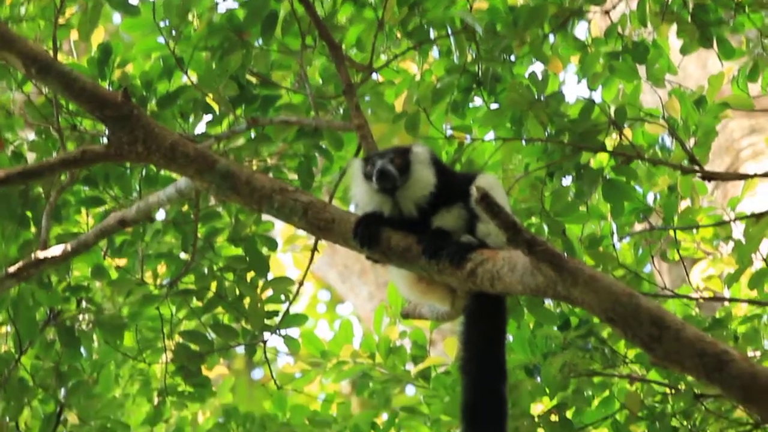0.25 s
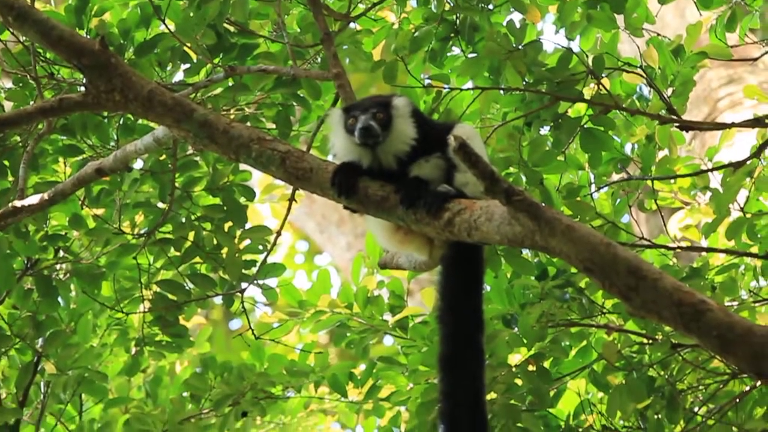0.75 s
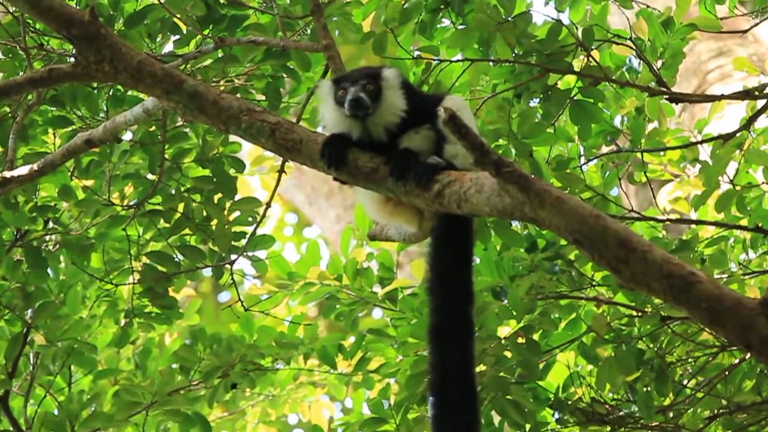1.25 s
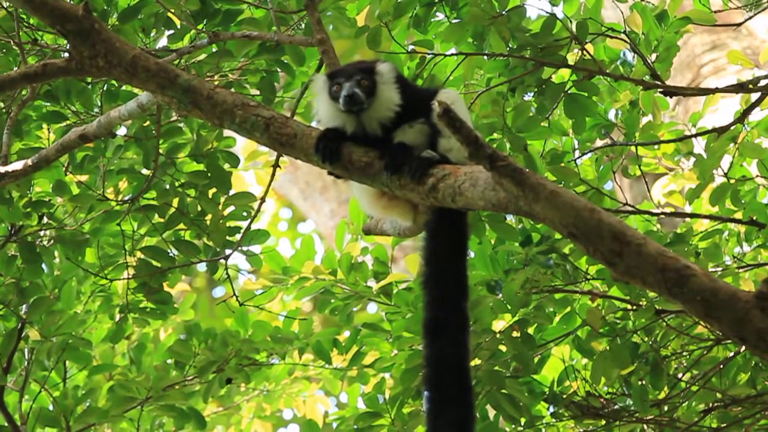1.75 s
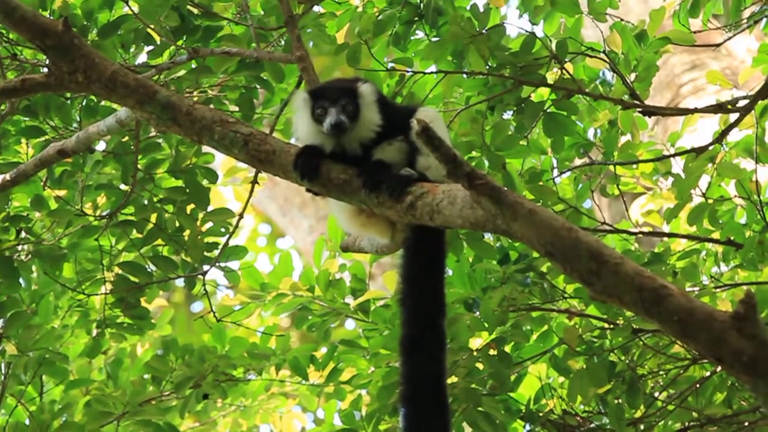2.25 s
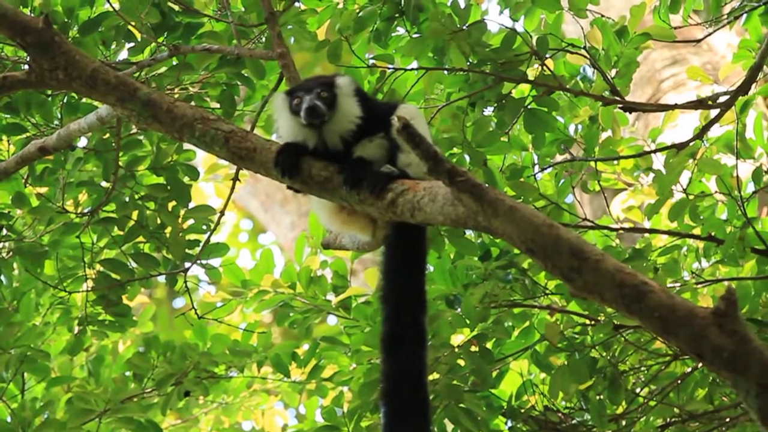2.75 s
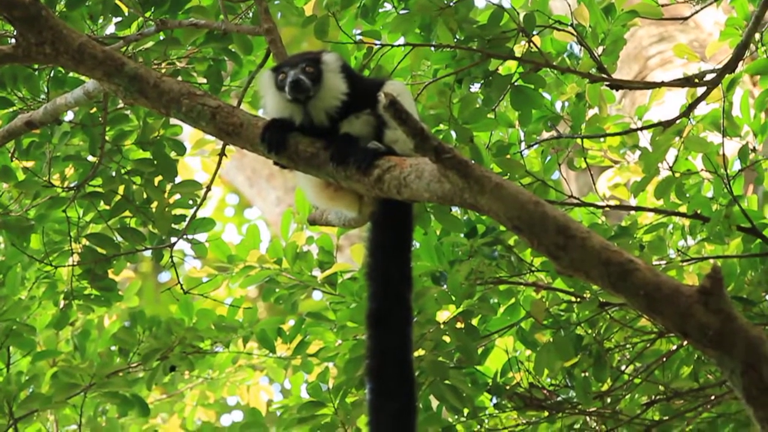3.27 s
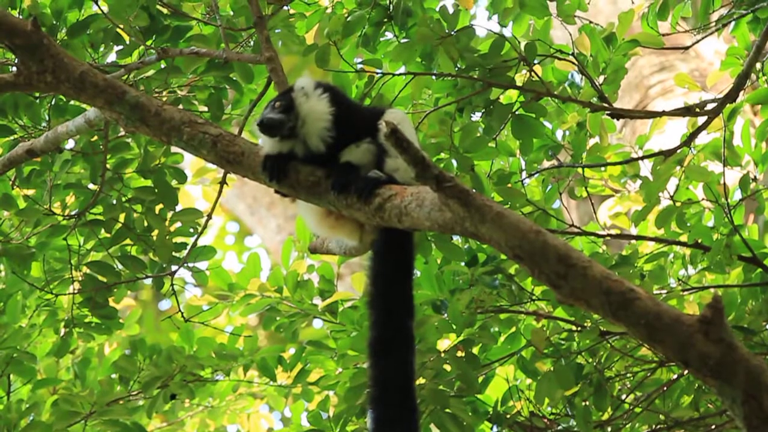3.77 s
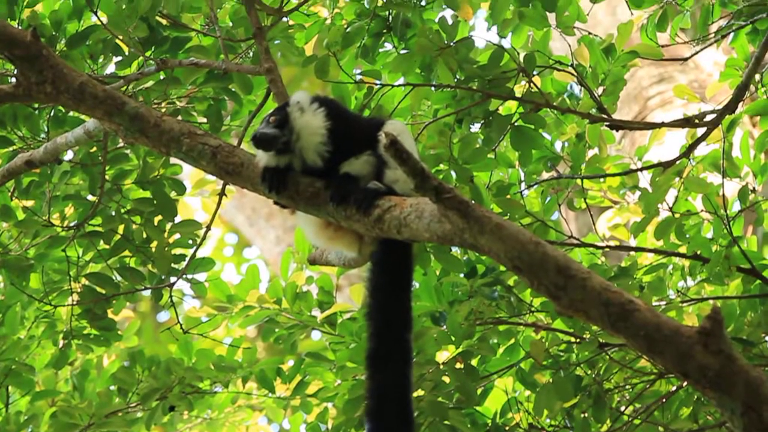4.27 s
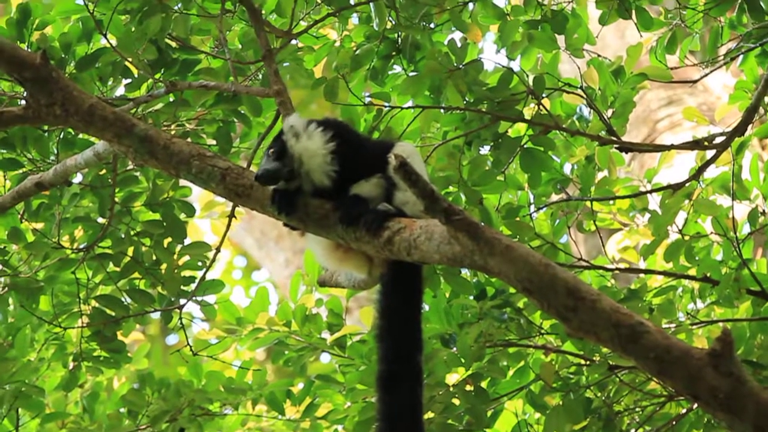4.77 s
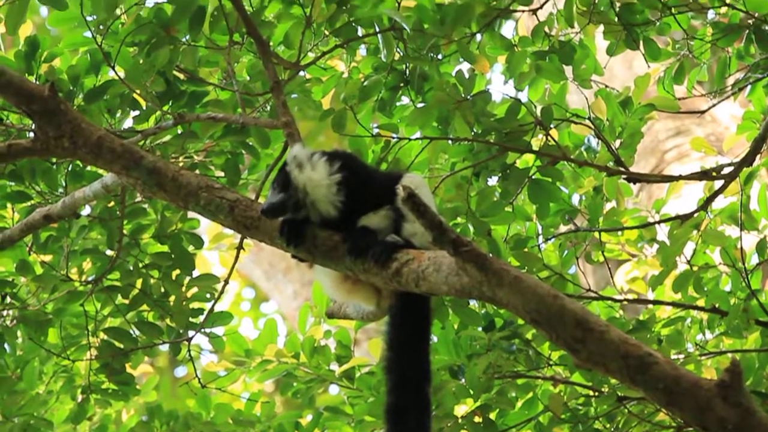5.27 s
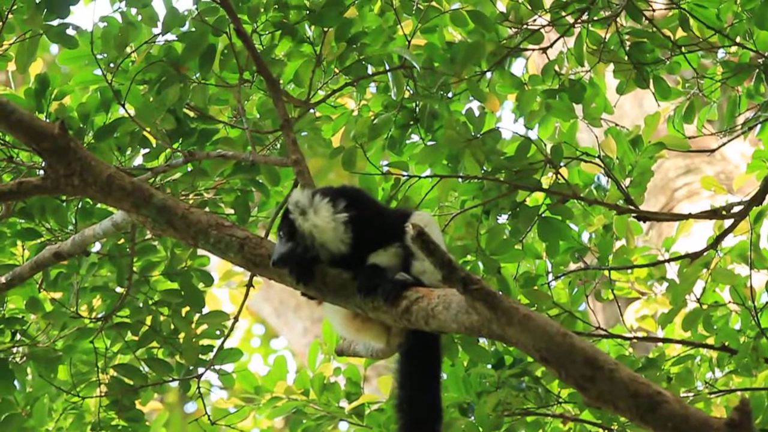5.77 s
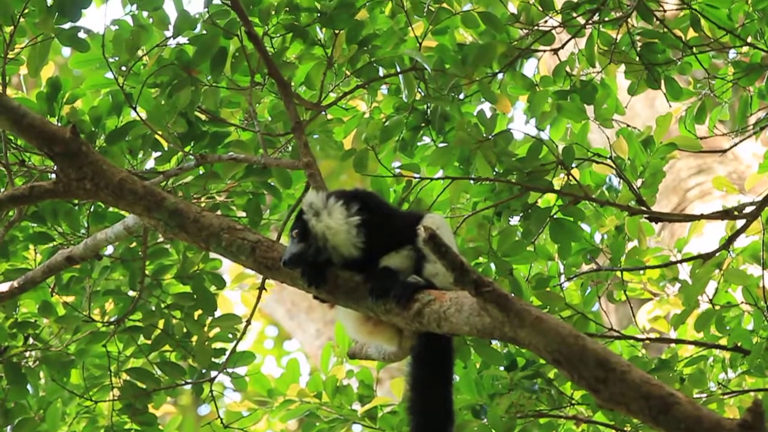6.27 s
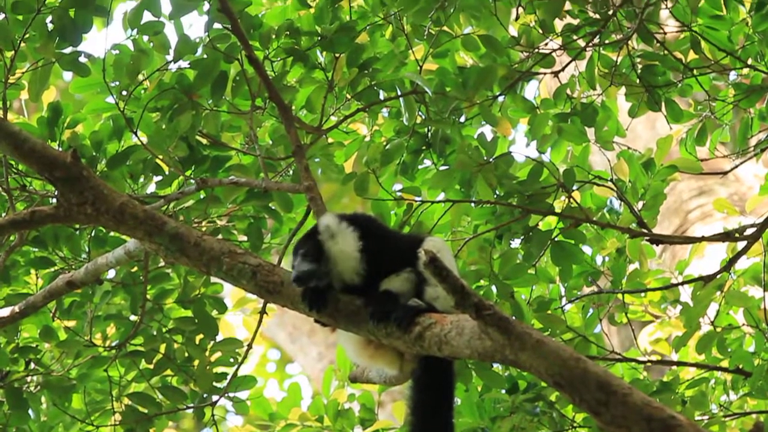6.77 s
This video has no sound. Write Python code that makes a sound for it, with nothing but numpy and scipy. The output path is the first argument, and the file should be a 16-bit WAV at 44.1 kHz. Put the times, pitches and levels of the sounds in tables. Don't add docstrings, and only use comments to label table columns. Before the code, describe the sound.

A humid rainforest heard from one fixed spot, in mono. Throughout, cicadas hold a very high, airy hiss, thin cricket whistles waver faintly, a far stream murmurs, and a distant crowd of frogs clatters softly, blurred by echoes and gently rising and falling. A katydid gives a quick dry rattle at once, then near 0.9, 2.5, 2.8 (faint), 3.9 and 5.4 seconds. From 0.2 seconds individual frogs knock at different pitches and distances, some dull and dry, others smeared among leaves. A nearer frog cuts through with sharp, woody double clicks and short trunk echoes at about 0.9, 1.6, 2.3, 2.9, 3.6, 4.5, 5.4 and 6.6. Faint low breeze swells around 2 and strongest near 5.7. Soft drops land at 1.0, 2.5 and 2.8; a bigger one slaps and spatters at 5.7. From about 4 seconds a closer cicada swells, staying brighter to the end at seven.

```python
import sys
import numpy as np
from scipy import signal
from scipy.io import wavfile
from scipy.ndimage import uniform_filter1d

SR = 44100
rng = np.random.default_rng(int(sys.argv[2]) if len(sys.argv) > 2 else 0)


def store_wav(level_fs):
    pcm = np.round(np.clip(np.atleast_2d(level_fs), -1, 1) * 32767)
    wavfile.write(sys.argv[1], SR, pcm.T.astype(np.int16))


def field_ratio(decibels):
    return 10 ** (np.asarray(decibels, dtype=float) / 20)


N = 309701

# freq_hz, density_db_per_hz
STREAM_SPECTRUM = [(25, -58), (60, -19), (120, -17.5), (230, -11), (400, -12.5), (800, -14), (950, -20),
                   (1500, -18.5), (3000, -26.5), (5300, -24.5), (6500, -17.5), (7500, -17), (8500, -11.5),
                   (11000, -32)]
STREAM_LEVEL_DB = -47.5
# freq_hz, width_hz, level_db
STREAM_HOLLOWS = [(325.4, 54, -66), (533.7, 24, -60), (757, 34, -60), (825, 50, -67)]
# freq_hz, density_db_per_hz
BREEZE_SPECTRUM = [(40, -32), (90, -2.5), (200, 1.5), (330, 7), (450, -59)]
# centre_s, level_db
GUSTS = [
    (0, -72),
    (1.86, -53.5),
    (2.7, -53.5),
    (4.9, -55),
    (5.7, -47),
]
GUST_WIDTH_S, LULL_DB = 0.32, -72
# freq_hz, width_hz, level_db
CRICKETS = [(5890, 27, -65.5), (6900, 26, -71), (4296, 50, -70)]

# freq_hz, density_db_per_hz
CICADA_SPECTRUM = [(6180, -31), (10300, -16), (11000, 0), (12600, 7.5), (14200, 6.5), (15200, 5.5),
                   (15400, 1), (16300, 0)]
CICADA_LEVEL_DB = -40
# freq_hz, density_db_per_hz
SWELL_SPECTRUM = [(4290, -40), (7300, -24), (7870, -10.5), (8520, 2), (9200, 2.5), (9900, 3), (10200, 2.5),
                  (10900, -10), (11200, -18), (14600, -32), (22000, -120)]
# time_s, level_db
SWELL_EFFORT = [(0, -45), (.6, -47), (3.3, -49), (3.8, -46), (5.0, -43), (5.6, -40.5), (7.02, -40.5)]

# time_s, level_db
CHORUS_LEVEL = [(0, -40.5), (1.0, -40.5), (1.25, -44.5), (1.6, -39), (2.1, -43.5), (2.9, -40), (3.5, -41),
                (4.1, -39.5), (4.8, -43), (5.6, -40.5), (6.0, -41), (7.02, -41)]
CHORUS_CALLS_PER_S, CHORUS_SPREAD_DB, CHORUS_TREBLE_DB = 180, 4.5, -1
# freq_hz, width_hz, level_db
FAR_SAC = [(1805, 76, 1), (1930, 140, -4.5), (2076, 810, 18), (2376, 270, 12), (2560, 540, -29),
           (2900, 42, -15)]
# freq_hz, width_hz, level_db
FAR_SAC_TOP = [(3740, 450, -5), (4044, 330, -5.5), (4580, 350, -7), (4930, 360, -10), (5520, 340, -14.5),
               (6310, 150, -23)]

# start_s, peak_db, wing_hz
KATYDID_CALLS = [
    (.034, -25, 9100),
    (0.872, -27, 8470),
    (2.524, -27, 8600),
    (2.802, -36, 8900),
    (3.904, -26.5, 8560),
    (5.355, -26, 8420),
]
STROKE_MS, STROKE_FADE_MS = 7.2, 71

# start_s, peak_db
BASS_VOICE = (1820, -13, 4, -2)
BASS_CALLS = [(0.2277, -22), (1.6662, -30), (1.9356, -21), (2.8069, -21), (3.213, -27.5), (3.598, -23),
              (4.491, -20.5), (5.4451, -22), (5.5277, -28.5), (6.195, -22.5)]
TENOR_VOICE = (2340, -13.5, 1, 5.5)
TENOR_CALLS = [(0.2545, -28.5), (1.1652, -32), (1.3221, -33), (1.9912, -30), (3.5751, -26), (4.263, -33.5),
               (4.4544, -33), (4.6825, -27.5), (4.8065, -40), (5.246, -29.5), (5.7219, -29.5),
               (5.8113, -30.5), (6.5904, -36), (6.9798, -36)]
NEIGHBOUR_VOICE = (2200, -28, .4, -4)
NEIGHBOUR_CALLS = [(.3308, -20.5), (1.5052, -21.5), (2.336, -20.5), (3.2917, -21), (4.158, -21),
                   (5.044, -23)]
DRY_VOICE = (2400, -17, 1.5, -4)
DRY_CALLS = [(0.433, -27), (1.264, -24.5), (1.562, -23), (2.2657, -27), (2.597, -25.5), (5.0517, -20),
             (5.4922, -31), (5.9446, -29), (6.13, -27), (6.6406, -31)]
ALTO_VOICE = (2520, -12.5, 7.5, 2.6)
ALTO_CALLS = [(0.5372, -30.5), (1.3912, -29), (1.6239, -29.5), (1.7647, -30.5), (1.9575, -27.5),
              (4.759, -25.5), (6.1438, -24.5), (6.539, -23.5), (6.905, -27), (6.9556, -29)]
GULLY_VOICE = (2330, -8, .65, 7.5)
GULLY_CALLS = [(.8361, -26.5), (1.2211, -26.5), (1.2953, -32.5), (2.2452, -27), (2.615, -31), (3.1875, -28)]
BRIGHT_VOICE = (2472, -7.5, 3.5, -2.5)
BRIGHT_CALLS = [(1.0101, -28), (3.262, -35), (3.8087, -35), (3.8803, -32), (4.0523, -26.5), (5.0059, -30.5)]
PITCH_SCATTER = 0.021
FAR_T60_S, FAR_CUTOFF_HZ = 0.59, 2950

# start_s, peak_db
NEAR_CALLS = [
    (.8837, -14),
    (1.5712, -13.7),
    (2.3025, -14.2),
    (2.8945, -13.8),
    (3.6305, -14.3),
    (4.5153, -14.3),
    (5.4259, -14.2),
    (6.5595, -14),
]
# freq_hz, width_hz, level_db
NEAR_SAC = [(1850, 105, -6), (2250, 200, -15), (2590, 220, 0), (2922, 45, -17), (3080, 50, -24)]
# freq_hz, width_hz, level_db
NEAR_SAC_TOP = [(3500, 160, -21), (3950, 220, -18), (4360, 160, -14), (4890, 170, -19), (5780, 300, -14),
                (6230, 150, -20), (6800, 220, -18)]
# low_hz, high_hz
SAC_EDGES_HZ = [1886, 7500]
# delay_ms, level_db
TRUNK_ECHOES = [(1.7, -11), (7.0, -10), (9.3, -13), (12.5, -15), (17, -16), (23.5, -18), (29, -16),
                (33.5, -16), (35.5, -13), (49, -18), (80, -19)]
NEAR_WET_DB, NEAR_T60_S, NEAR_TOP_T60_S = -6, .33, .15
NEAR_GAP_MS, SECOND_CLICK_DB, SECOND_CLICK_TREBLE_DB = 4.88, -2.3, -4

# start_s, peak_db, low_hz, high_hz, patter_ms
DROPS = [
    (1.010, -34.5, 280, 750, 10.),
    (2.515, -41, 430, 600, 8.),
    (2.828, -44, 950, 1200, 8.),
    (5.7165, -32.5, 70, 800, 12.),
    (5.7165, -29, 800, 1600, 8.),
    (5.717, -24, 1300, 3800, 3.),
    (5.803, -32, 950, 1800, 6.),
    (5.811, -39, 400, 800, 8.),
]

BAND_LIMIT_HZ = 15730


def evened(x):
    return x / np.sqrt(np.mean(x ** 2) + 1e-20)


def curve(rows):
    return np.interp(np.arange(N) / SR, *np.transpose(rows))


def add(mix, start_s, sound):
    part = mix[round(start_s * SR):][:len(sound)]
    part += sound[:len(part)]


def hiss(spectrum, patchy_db, sway_db):
    frames = N // 256 + 5
    bin_hz = np.fft.rfftfreq(1024, 1 / SR)
    real, imag, patches = rng.standard_normal((frames, 513, 3)).T
    patches = uniform_filter1d(patches, size=12, axis=0)
    patches = evened(uniform_filter1d(patches, size=14, axis=1))
    sway = evened(uniform_filter1d(rng.standard_normal(frames), size=25))
    freq_hz, density_db = np.transpose(spectrum)
    shape_db = np.interp(np.log(bin_hz + 1), np.log(freq_hz + 1), density_db, left=-90, right=-90)
    level_db = shape_db[:, None] + patchy_db * patches + sway_db * sway
    z = (real + 1j * imag) * field_ratio(level_db)
    return evened(signal.istft(z, nperseg=1024, noverlap=768)[1][:N])


def resonance(noise, freq_hz, width_hz):
    b, a = signal.iirpeak(freq_hz, freq_hz / width_hz, fs=SR)
    return evened(signal.lfilter(b, a, noise))


def ring(modes, size=1300):
    t = np.arange(size) / SR
    x = np.zeros(size)
    for freq_hz, width_hz, level_db in modes:
        x += field_ratio(level_db) * np.exp(-np.pi * width_hz * t) * np.sin(2 * np.pi * freq_hz * t)
    band = signal.cheby1(5, .3, SAC_EDGES_HZ, "bandpass", fs=SR, output="sos")
    return signal.sosfilt(band, x)


def leaves(t60_s, blur_ms, lumpy_db=4.5, size=15000):
    t = np.arange(size) / SR
    noise, lumps = rng.standard_normal((2, size))
    lumps = evened(uniform_filter1d(lumps, size=200))
    build_up = 1 - np.exp(-1000 * t / max(blur_ms, .3))
    tail = noise * field_ratio(lumpy_db * lumps - 60 * t / t60_s) * build_up
    return tail / np.linalg.norm(tail)


def click_pair(gap_ms, second_db):
    x = np.zeros(400)
    x[0] = 1
    x[int(gap_ms * SR / 1000)] = field_ratio(second_db)
    return x


def stream():
    out = field_ratio(STREAM_LEVEL_DB) * hiss(STREAM_SPECTRUM, 0.98, 0.25)
    for freq_hz, width_hz, level_db in STREAM_HOLLOWS:
        out += field_ratio(level_db) * resonance(rng.standard_normal(N), freq_hz, width_hz)
    return out


def breeze():
    t = np.arange(N) / SR
    level = np.full(N, field_ratio(LULL_DB))
    for centre_s, level_db in GUSTS:
        level += field_ratio(level_db - 9.5) * np.exp(-((t - centre_s) / GUST_WIDTH_S) ** 2)
    return level * hiss(BREEZE_SPECTRUM, 0.51, 0.9)


def crickets():
    out = np.zeros(N)
    for freq_hz, width_hz, level_db in CRICKETS:
        noise, mood = rng.standard_normal((2, N))
        mood = uniform_filter1d(mood, size=9000)
        mood = evened(uniform_filter1d(mood, size=9000))
        out += field_ratio(level_db + 2.9 * mood) * resonance(noise, freq_hz, width_hz)
    return out


def cicadas():
    sheet = field_ratio(CICADA_LEVEL_DB) * hiss(CICADA_SPECTRUM, .4, .2)
    swelling = field_ratio(curve(SWELL_EFFORT)) * hiss(SWELL_SPECTRUM, .4, .2)
    return sheet + swelling


def chorus():
    body = ring(FAR_SAC) + field_ratio(CHORUS_TREBLE_DB) * ring(FAR_SAC_TOP)
    lead_in = 15000
    out = np.zeros(N)
    for strength, chance in rng.random((6, 2, N + lead_in)):
        called = chance < CHORUS_CALLS_PER_S / 6 / SR
        calls = field_ratio(-CHORUS_SPREAD_DB * np.log(strength + .01)) * called
        path = leaves(1.0, 4.0)
        path[0] = 0.32
        clicks = np.convolve(body, click_pair(rng.uniform(4.3, 5.8), -3.0))
        call = signal.fftconvolve(clicks, path)
        out += signal.fftconvolve(calls, call)[lead_in:][:N]
    level = np.sqrt(abs(uniform_filter1d(out ** 2, size=5000)) + 1e-9)
    return field_ratio(curve(CHORUS_LEVEL)) * evened(out / level)


def katydid():
    out, t = np.zeros(N), np.arange(150) / SR
    attack_s = .0004
    envelope = (t / attack_s) * np.exp(1 - t / attack_s)
    for start_s, peak_db, wing_hz in KATYDID_CALLS:
        call = np.zeros(5000)
        for k, (bend, size) in enumerate(rng.uniform(0, 1, (10, 2))):
            tone_hz = wing_hz * (.93 + .07 * (k % 2) + .06 * bend)
            tick = np.sin(2 * np.pi * tone_hz * t) * envelope
            level = (.6 + .4 * size) * np.exp(-k * STROKE_MS / STROKE_FADE_MS)
            add(call, k * STROKE_MS / 1000, tick * level)
        wet = signal.fftconvolve(call, leaves(.2, 4.0))
        add(out, start_s, field_ratio(peak_db) * call)
        add(out, start_s, field_ratio(peak_db - 4.0) * wet)
    return out


def far_frog(voice, calls):
    out, top = np.zeros(N), ring(FAR_SAC_TOP)
    strongest_hz, treble_db, blur_ms, leaf_echo_db = voice
    dull = signal.butter(6, FAR_CUTOFF_HZ, fs=SR, output="sos")
    for start_s, peak_db in calls:
        tone_hz = strongest_hz * (1 + PITCH_SCATTER * rng.uniform(-1.5, 1))
        body = ring(FAR_SAC + [(tone_hz, 110, 5.5)])
        body = signal.sosfilt(dull, body) + field_ratio(treble_db + 19.5) * top
        early = leaves(.04 + .008 * blur_ms, blur_ms, lumpy_db=2, size=7000)
        path = early + field_ratio(leaf_echo_db) * leaves(FAR_T60_S, 20.0, size=7000)
        path[0] = 1.9 * np.exp(-blur_ms / .9)
        clicks = np.convolve(body, click_pair(rng.uniform(4.6, 5.4), -1.5))
        call = signal.fftconvolve(clicks, path)
        add(out, start_s, field_ratio(peak_db) * call / abs(call).max())
    return out


def far_frogs():
    frogs = [(BASS_VOICE, BASS_CALLS), (TENOR_VOICE, TENOR_CALLS), (NEIGHBOUR_VOICE, NEIGHBOUR_CALLS),
             (DRY_VOICE, DRY_CALLS), (ALTO_VOICE, ALTO_CALLS), (GULLY_VOICE, GULLY_CALLS),
             (BRIGHT_VOICE, BRIGHT_CALLS)]
    return sum(far_frog(voice, calls) for voice, calls in frogs)


def near_frog():
    clicks, echoes = np.zeros(N), np.zeros(15000)
    for start_s, peak_db in NEAR_CALLS:
        add(clicks, start_s, field_ratio([peak_db]))
    echoes[0] = 1
    for delay_ms, level_db in TRUNK_ECHOES:
        echoes[round(delay_ms * SR / 1000)] = field_ratio(level_db)
    path = echoes + field_ratio(NEAR_WET_DB) * leaves(NEAR_T60_S, 9.0)
    low = signal.fftconvolve(ring(NEAR_SAC), path)
    haze = field_ratio(-6.0) * leaves(NEAR_TOP_T60_S, 2.5)
    haze[0] = 1
    top = signal.fftconvolve(ring(NEAR_SAC_TOP), haze)
    call = np.convolve(low, click_pair(NEAR_GAP_MS, SECOND_CLICK_DB))
    call += np.convolve(top, click_pair(NEAR_GAP_MS, SECOND_CLICK_TREBLE_DB))
    return signal.fftconvolve(clicks, call / abs(call[:60]).max())[:N]


def drops():
    out, t = np.zeros(N), np.arange(2500) / SR
    for start_s, peak_db, low_hz, high_hz, patter_ms in DROPS:
        envelope = np.exp(-t / .0015) + .25 * np.exp(-1000 * t / patter_ms)
        slap = rng.standard_normal(len(t)) * envelope
        band = signal.butter(2, [low_hz, high_hz], "bandpass", fs=SR, output="sos")
        slap = signal.sosfilt(band, slap)
        add(out, start_s, field_ratio(peak_db) * slap / abs(slap).max())
    return out


def scene():
    background = stream() + breeze() + crickets() + cicadas() + chorus()
    mono = background + katydid() + far_frogs() + near_frog() + drops()
    return np.array([mono, mono])


def roll_off(x):
    return signal.sosfilt(signal.butter(12, 16550, fs=SR, output="sos"), x)


def record(dry):
    edge = signal.firwin(2001, BAND_LIMIT_HZ, window=("kaiser", 12), fs=SR)
    mix = signal.oaconvolve(dry, edge[None], "same")
    return roll_off(mix)


dry = scene()
out = record(dry)
store_wav(out)
```